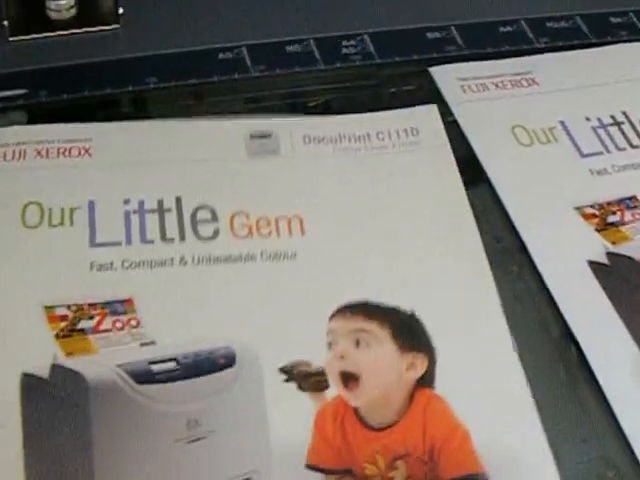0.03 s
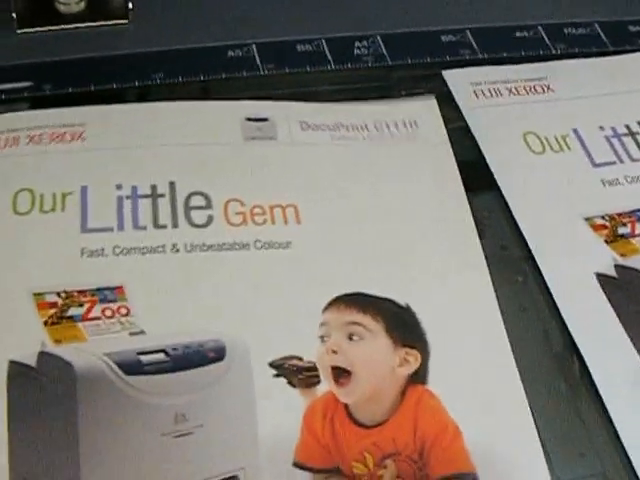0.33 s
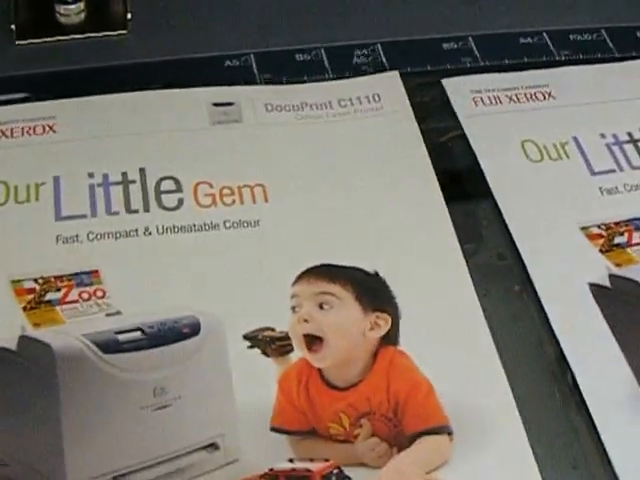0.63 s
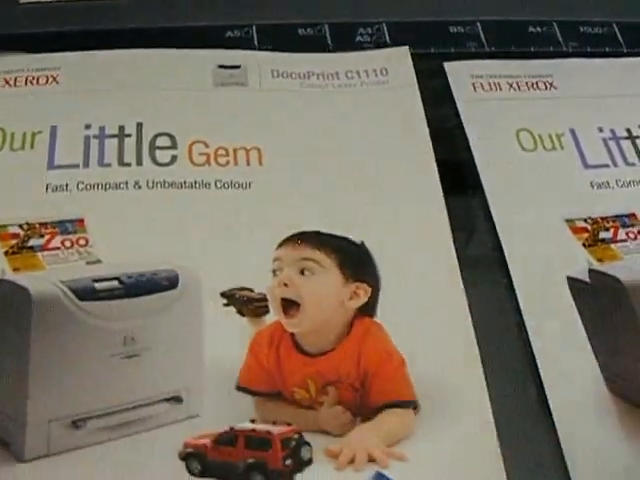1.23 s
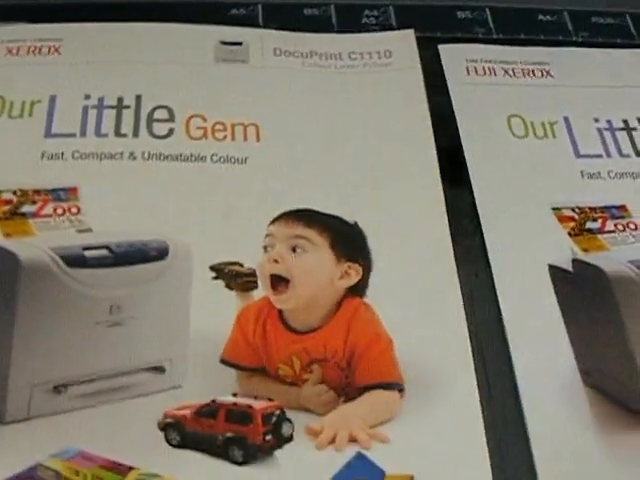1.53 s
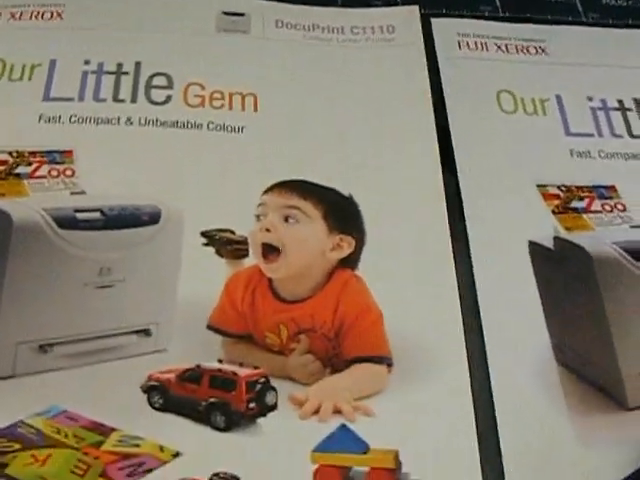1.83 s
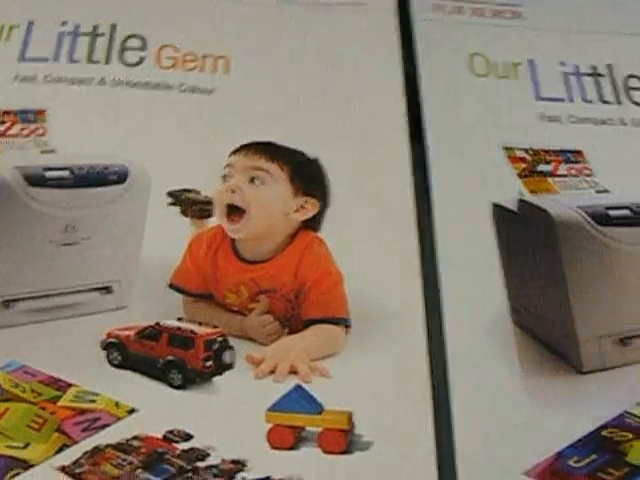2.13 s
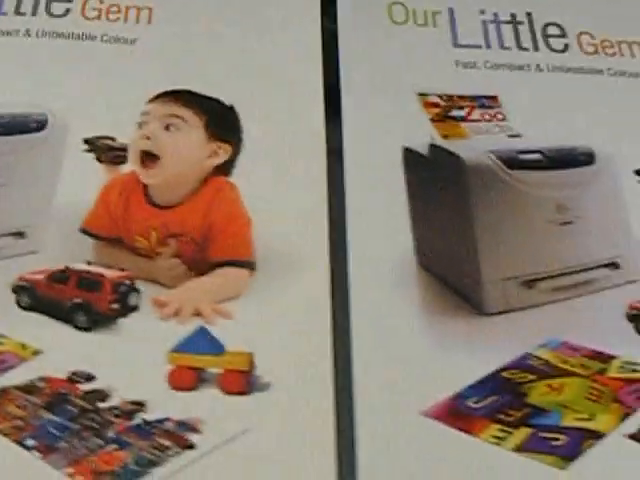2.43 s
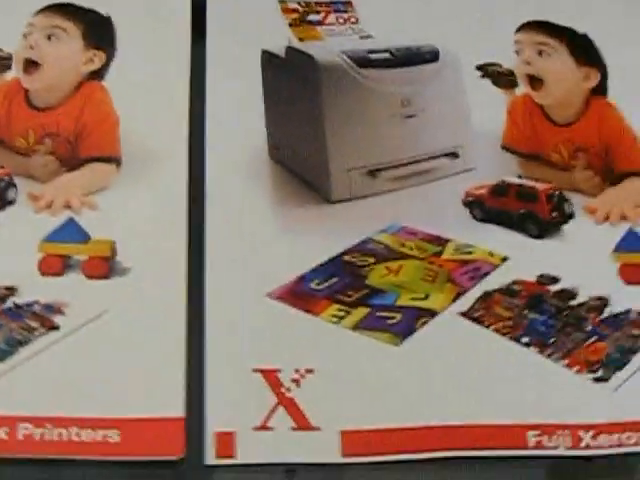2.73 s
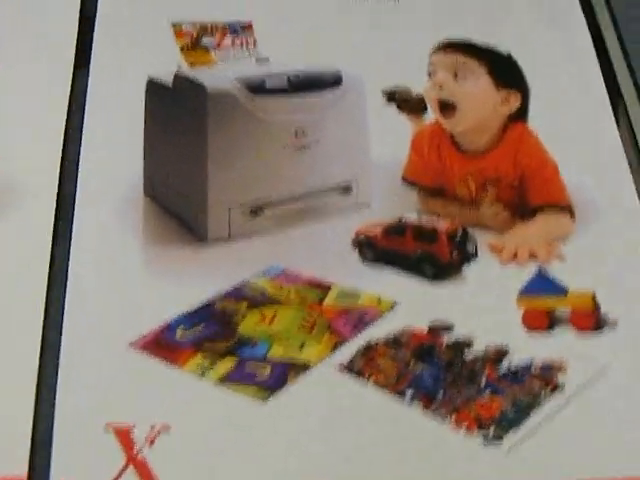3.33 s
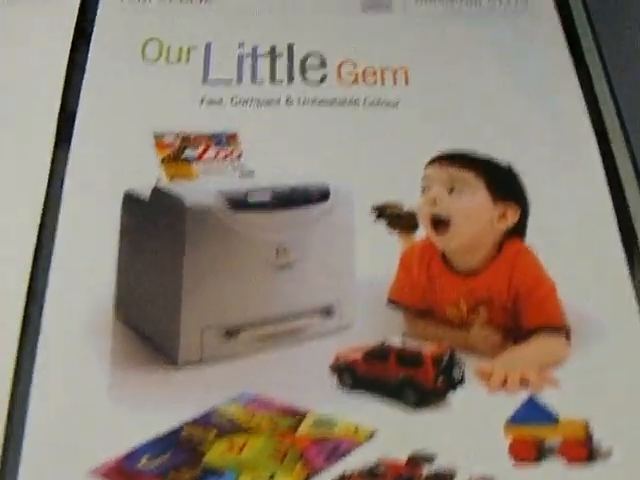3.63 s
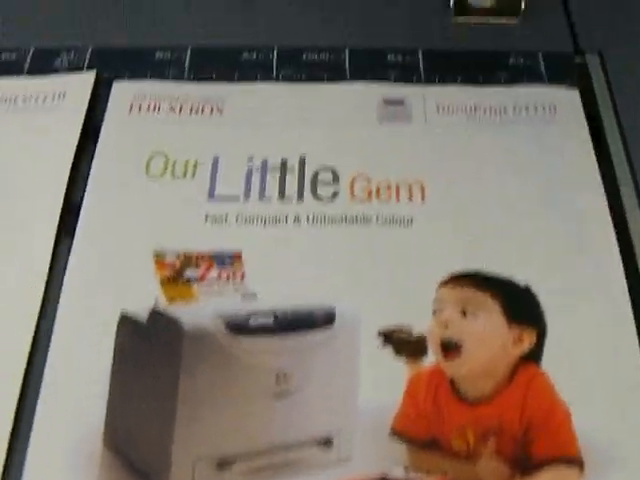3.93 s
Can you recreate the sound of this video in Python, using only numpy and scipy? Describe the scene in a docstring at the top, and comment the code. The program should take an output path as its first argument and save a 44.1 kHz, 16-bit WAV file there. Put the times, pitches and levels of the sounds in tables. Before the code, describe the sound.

Close up in an office, a copier's fans whir steadily with thin, wavering whines. Light paper rustles come first, then a loud plastic click and soft knocks. The sound ducks, recovers and gains a low drone.

```python
"""An office copier idles close to the microphone: cooling air rushes and rings the cabinet's cavities,
two small rotors whine and beat, mains and fans hum. Paper slides, ticks and taps on its top.
One sharp plastic click overloads the microphone, whose gain control ducks and recovers;
a low drone then joins the hum."""
import sys
import numpy as np
from scipy import signal
from scipy.io import wavfile
from scipy.ndimage import uniform_filter1d

SR = 44100
rng = np.random.default_rng(int(sys.argv[2]) if len(sys.argv) > 2 else 0)


def bounce(signal):
    """Save signal as a 16-bit WAV file at the path given by the first command-line argument."""
    frames = np.transpose(np.atleast_2d(signal))
    limited = np.clip(frames, -1, 1)
    pcm = np.round(limited * 32767).astype(np.int16)
    wavfile.write(sys.argv[1], SR, pcm)


N = 176400
TIME = np.arange(N) / SR


def from_db(db):
    """Decibels to gain."""
    return 10 ** (np.asarray(db) / 20)


def unit_rms(x):
    """Scale to rms 1."""
    return x / np.sqrt(np.mean(x ** 2) + 1e-20)


def curves(rows):
    """Each column after t/s, interpolated to every sample."""
    times, *columns = np.transpose(rows)
    return [np.interp(TIME, times, column) for column in columns]


def drift(corner_hz):
    """Slow random wander, rms 1."""
    step, warmup = 40, 2000
    pole = np.exp(-2 * np.pi * corner_hz * step / SR)
    white = rng.standard_normal(N // step + warmup + 2)
    slow = signal.lfilter([1], [1, -2 * pole, pole ** 2], white)[warmup:]
    return np.interp(np.arange(N) / step, np.arange(len(slow)), unit_rms(slow))


def impulse(at_s, db):
    """One contact, one sample long."""
    return from_db(db) * (np.arange(N) == int(at_s * SR))


def ring(hits, hz, t60_s):
    """One mode: a unit impulse starts a decaying sine of height 1."""
    pole, angle = from_db(-60 / (t60_s * SR)), 2 * np.pi * hz / SR
    return signal.lfilter([0, np.sin(angle)], [1, -2 * pole * np.cos(angle), pole ** 2], hits + 1e-18)


def resonate(x, hz, width_hz):
    """Two-pole band-pass."""
    pole, angle = np.exp(-np.pi * width_hz / SR), 2 * np.pi * hz / SR
    return signal.lfilter([1, 0, -1], [1, -2 * pole * np.cos(angle), pole ** 2], x)


def low_pass(x, hz, order):
    """Butterworth low-pass."""
    return signal.sosfilt(signal.butter(order, hz, fs=SR, output="sos"), x)


def tone(hz, db, flutter_db=1.7, wobble_rad=.39):
    """A sine whose level and phase waver in the moving air."""
    phase = 2 * np.pi * np.cumsum(hz * np.ones(N)) / SR
    if wobble_rad:
        phase += wobble_rad * drift(corner_hz=2.7)
    return np.sqrt(2) * from_db(db + flutter_db * drift(corner_hz=15)) * np.sin(phase)


# Cooling air spectrum: f/Hz, relative density/dB
AIR_SPECTRUM = [(25, -17.5), (45, -12), (75, -3), (105, -6), (140, 1), (240, -1), (380, 3), (520, 0.5),
                (700, -3.5), (1100, -4.5), (1600, -6.5), (2300, -8.5), (3200, -14), (4000, -21),
                (5000, -37.5), (6000, -55.5), (7000, -56)]
# Air gain at the microphone: t/s, rumble/dB, body/dB, treble/dB
AIR_GAINS = [(0, -19, -23.5, -23.5), (.35, -20.5, -27, -25.5), (.7, -17.5, -27, -25),
             (1.6, -19, -25.5, -26), (2.2, -22, -26, -25.5), (2.8, -19.5, -26, -23.5),
             (3.45, -20.5, -24, -26.5), (4, -25, -25.5, -26.5)]


def cooling_air(rumble_hz=107, body_hz=350, treble_hz=2240, flicker_db=.5):
    """Turbulence from the vents, in third-octave bands that each flicker a little."""
    edges_hz = 22 * 2 ** np.arange(0, 8.6, 1 / 3)
    white = rng.standard_normal((2, N))
    gains_db = np.array(curves(AIR_GAINS))
    spectrum_hz, spectrum_db = np.transpose(AIR_SPECTRUM)
    log_anchors = np.log([rumble_hz, body_hz, treble_hz])
    steady, out = 0, 0
    for k, (low, high) in enumerate(zip(edges_hz, edges_hz[1:])):
        log_centre = np.log(low * high) / 2
        density_db = np.interp(log_centre, np.log(spectrum_hz), spectrum_db)
        band = signal.sosfilt(signal.butter(3, [low, high], "band", fs=SR, output="sos"), white[k % 2])
        band *= from_db(density_db + flicker_db * drift(corner_hz=11))
        shares = np.array([np.interp(log_centre, log_anchors, row) for row in np.eye(3)])
        steady += band
        out += band * from_db(shares @ gains_db)
    return out / np.std(steady)


# Cabinet cavities: f/Hz, nominal width/Hz, level/dB
CAVITY_MODES = [(346.8, 19, -42), (406.3, 15, -44), (465, 28, -44.5), (760.5, 14, -46), (1238, 71, -44.5),
                (2190, 66, -49.5), (2777, 66, -47), (3310, 210, -49.5)]
# Cavity gain at the microphone: t/s, gain/dB
CAVITY_GAIN = [(0, -6), (.8, 3.5), (1.6, 6), (2.4, 1.5), (3.4, -8), (4, -11)]


def cavities():
    """Air rings the hollow cabinet: narrow humps of noise."""
    gain_db, = curves(CAVITY_GAIN)
    humps = 0
    for hz, width_hz, db in CAVITY_MODES:
        broad = resonate(rng.standard_normal(N), hz, 2 * width_hz)
        narrow = resonate(broad, hz, 2 * width_hz)
        humps += from_db(db) * unit_rms(narrow)
    return from_db(gain_db) * humps


# Fast rotor speed: t/s, f/Hz
FAST_SPEED = [(0, 327.2), (.3, 327.45), (1.05, 327.72), (2, 327.5), (3.4, 327.66), (4, 328.1)]
# Slow rotor whines: t/s, harmonic 3 level/dB, harmonic 4 level/dB
SLOW_HARMONICS = [(0.099, -37, -30), (0.5, -40.5, -32), (0.998, -35, -30), (1.5, -31.5, -28),
                  (2.0, -33, -31.5), (2.35, -32.5, -31), (2.651, -35.5, -40.5), (3.4, -51, -37.5),
                  (3.9, -38.5, -34.5)]
# Fast rotor whines: t/s, harmonic 4 level/dB, harmonic 6 level/dB
FAST_HARMONICS = [(.1, -39.5, -59.5), (.5, -36, -40), (1, -37, -39), (1.502, -52, -35.5), (2, -42.5, -37),
                  (2.35, -36.5, -43.5), (2.65, -35, -42.5), (3.399, -46, -46.5), (3.899, -36.5, -40.5)]
# Beating whines: t/s, slow harmonic 6 level/dB, fast harmonic 5 level/dB
BEATING_PAIR = [(0, -38, -34.5), (.7, -39, -37.5), (1.25, -39, -37), (1.5, -44, -44), (2.1, -42, -41),
                (2.45, -47, -47), (2.75, -53, -37), (3.35, -45, -33), (3.6, -52, -40), (4, -50, -34.5)]
# Faint steady whines: f/Hz, level/dB
FAINT_TONES = [(1360, -45.5), (1497, -53), (2224, -49.5), (2293.5, -48), (2448, -56.5), (2992, -54.5),
               (3808, -55.5), (3944, -56)]


def rotors(slow_hz=271.95):
    """Two rotors whine at harmonics of their speeds, swelling and fading as the microphone moves."""
    fast_hz, = curves(FAST_SPEED)
    pitches_hz = [3 * slow_hz, 4 * slow_hz, 4 * fast_hz, 6 * fast_hz]
    pitches_hz += [6 * slow_hz, 5 * fast_hz]  # nearly meet, so they beat
    levels_db = curves(SLOW_HARMONICS) + curves(FAST_HARMONICS) + curves(BEATING_PAIR)
    whines = sum(tone(hz, db, flutter_db=.5, wobble_rad=0) for hz, db in zip(pitches_hz, levels_db))
    return whines + sum(tone(hz, db) for hz, db in FAINT_TONES)


# Mains and fan tones: f/Hz, level/dB
HUM_TONES = [(120, -46.5), (258, -44), (360.5, -39.5), (573.4, -33.5), (591, -45.5), (721, -43.5)]


def hum():
    """Steady low tones of the mains and the big fans."""
    return sum(tone(hz, db) for hz, db in HUM_TONES)


# Paper slides: centre t/s, sigma/s, level/dB, f/Hz
PAPER_SLIDES = [(.065, 0.0093, -32.5, 3930), (.098, 0.016, -32, 3600), (.18, 0.044, -34, 3140),
                (.59, 0.023, -32.5, 2600), (2.73, 0.017, -29, 2030), (2.8, 0.058, -31, 1960),
                (2.866, 0.0036, -24, 2490), (3.328, 0.018, -27, 1600)]


def paper_slides(grains_per_s=1800, grain_spread_db=3):
    """Sliding paper: dense friction grains in one broad resonance."""
    out = 0
    for centre_s, sigma_s, db, hz in PAPER_SLIDES:
        sizes = from_db(grain_spread_db * np.minimum(rng.exponential(1, N), 4))
        signs = rng.choice([-1, 1], N)
        grains = sizes * signs * (rng.random(N) < grains_per_s / SR)
        rub = low_pass(resonate(grains, hz, width_hz=1100), hz=4220, order=6)
        swell = np.exp(-.5 * ((TIME - centre_s) / sigma_s) ** 2)
        out += from_db(db) * unit_rms(rub) * swell
    return out


# Paper edge ticks: t/s, level before low-pass/dB, f/Hz
PAPER_TICKS = [(.085, -30, 4400), (.092, -25, 4300), (.174, -34, 4000), (.229, -28, 4500),
               (.476, -30, 2700), (.484, -25.5, 2000), (.574, -24.5, 2400), (.594, -24.5, 2500)]


def paper_ticks(decay_s=.005):
    """The paper's edge snaps: abrupt, dry bursts of noise."""
    out = 0
    for at_s, db, hz in PAPER_TICKS:
        crackle = unit_rms(resonate(rng.standard_normal(N), hz, width_hz=1100))
        envelope = (TIME >= at_s) * np.exp(-np.abs(TIME - at_s) / decay_s)
        out += from_db(db) * crackle * envelope
    return low_pass(out, hz=4150, order=7)


# Taps on the top: t/s, level/dB, f/Hz, t60/s
HANDLING_TAPS = [(.228, -12, 1630, 0.034), (0.484, -12, 2170, 0.01), (.594, -15.5, 2690, 0.026),
                 (2.892, -15, 75, .25), (2.906, -10, 227.1, 0.036), (2.972, -23, 310, 0.027),
                 (3.029, -11.5, 500, 0.016), (3.313, -16, 555, 0.085)]


def taps():
    """Soft handling knocks, each ringing one mode."""
    knocks = sum(ring(impulse(at_s, db), hz, t60_s) for at_s, db, hz, t60_s in HANDLING_TAPS)
    return low_pass(knocks, hz=4200, order=7)


# Click and rebounds: t/s, drive level/dB
CLICK_HITS = [(2.8674, 4), (2.8682, -2.5), (2.8762, -3), (2.881, -13)]
# Plastic modes: f/Hz, gain/dB, t60/s
PLASTIC_MODES = [(173, -18.5, 0.019), (1056, -15.5, 0.014), (2150, -14, 0.01), (2470, -10.5, 0.0098),
                 (3750, -13, 0.0037)]


def click():
    """A hard snap and its rebounds ring the plastic's modes, alternate ones inverted."""
    hits = sum(impulse(at_s, db) for at_s, db in CLICK_HITS)
    plastic = 0
    for k, (hz, db, t60_s) in enumerate(PLASTIC_MODES):
        plastic += (-1) ** k * from_db(db) * ring(hits, hz, t60_s)
    return low_pass(plastic, hz=4400, order=8)


def drone(start_s=3.26, rise_s=.06, final_hz=148.3, sharp_hz=9, settle_s=.14):
    """A low tone enters slightly sharp and sinks to its pitch."""
    age_s = np.maximum(TIME - start_s, 0)
    pitch_hz = final_hz + sharp_hz * np.exp(-age_s / settle_s)
    return np.minimum(age_s / rise_s, 1) * tone(pitch_hz, db=-32)


def scene():
    """The copier and the handling on its top, mono."""
    idle = cooling_air() + cavities() + rotors() + hum()
    handling = paper_slides() + paper_ticks() + taps() + click()
    return (idle + handling + drone())[None]


def gain_control(x, threshold_rms=.27, sense_s=.002, depth_db=18.7,
                 lag_s=.014, attack_s=.0037, hold_s=.027, release_s=.16):
    """An overload makes the gain drop a moment later, hold, and creep back."""
    overloaded = uniform_filter1d(x ** 2, int(sense_s * SR)) > threshold_rms ** 2
    since_overload_s = TIME - np.maximum.accumulate(np.where(overloaded, TIME, -10))
    duck_db = depth_db * np.exp(-np.maximum(since_overload_s - hold_s, 0) / release_s)
    duck_db = uniform_filter1d(duck_db, int(attack_s * SR))
    delayed_db = np.interp(TIME - lag_s, TIME, duck_db)
    return x * from_db(-delayed_db)


def record(dry):
    """Microphone chain: gain control, soft clipping, circuit hiss, steep low-pass."""
    ceiling, hiss_db, cutoff_hz = 1.1, -54.5, 6900
    clipped = ceiling * np.tanh(gain_control(dry[0]) / ceiling)
    hiss = from_db(hiss_db) * unit_rms(low_pass(rng.standard_normal(N), hz=5000, order=8))
    band_limit = signal.ellip(10, .3, 80, cutoff_hz, fs=SR, output="sos")
    return signal.sosfilt(band_limit, clipped + hiss)[None]


dry = scene()
out = record(dry)
bounce(out)
```